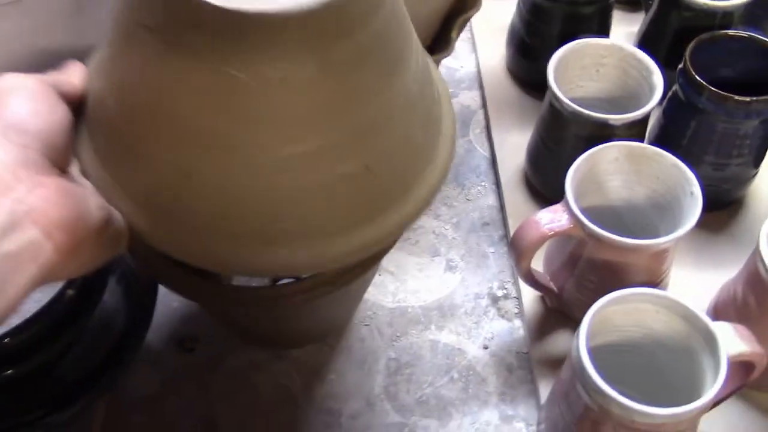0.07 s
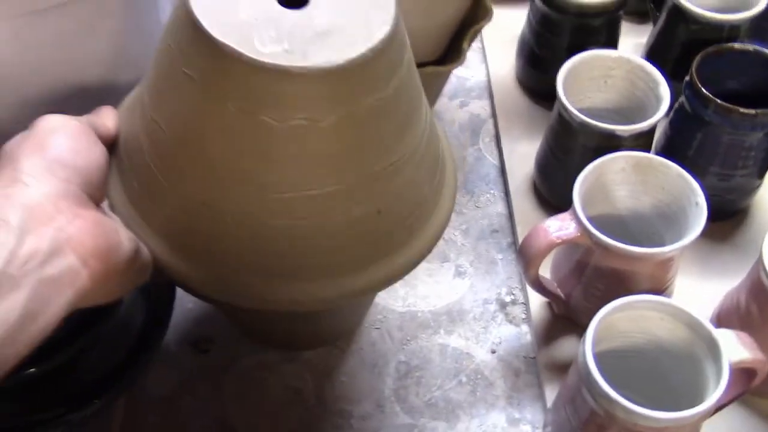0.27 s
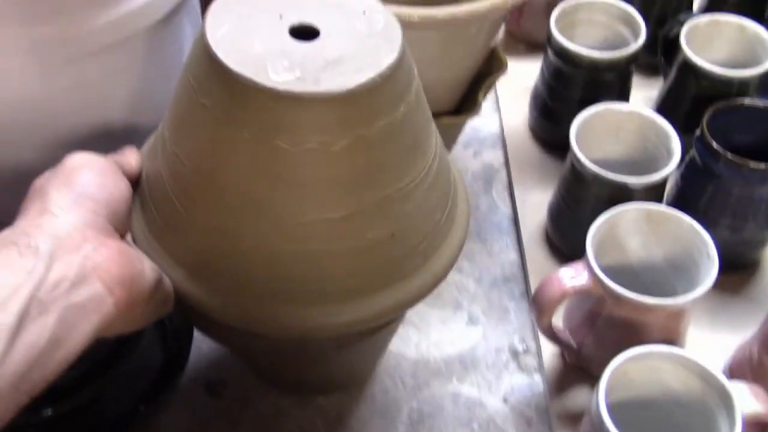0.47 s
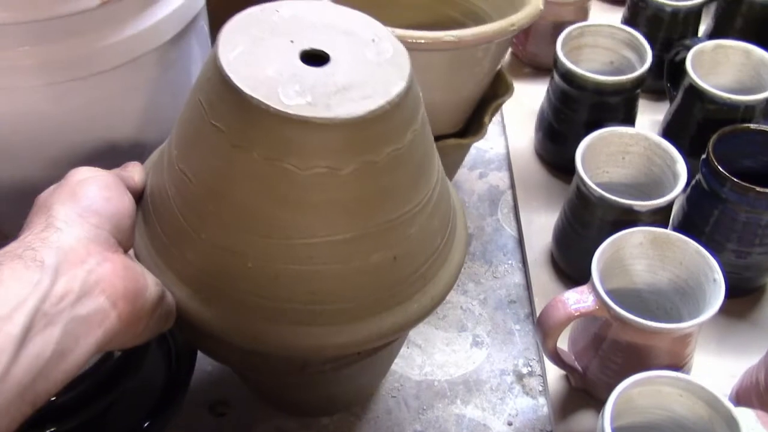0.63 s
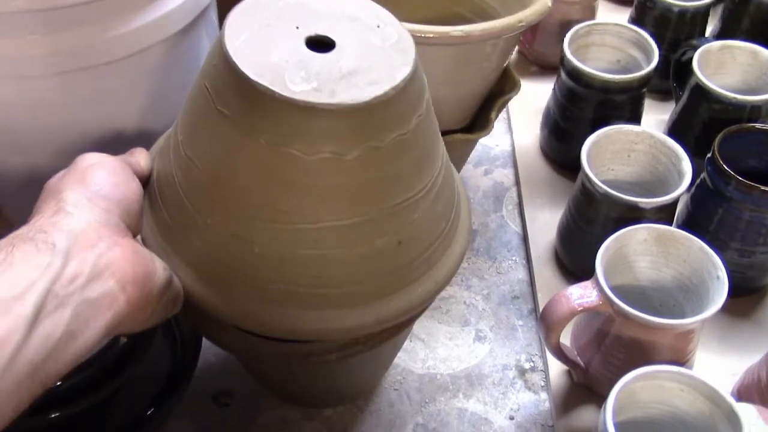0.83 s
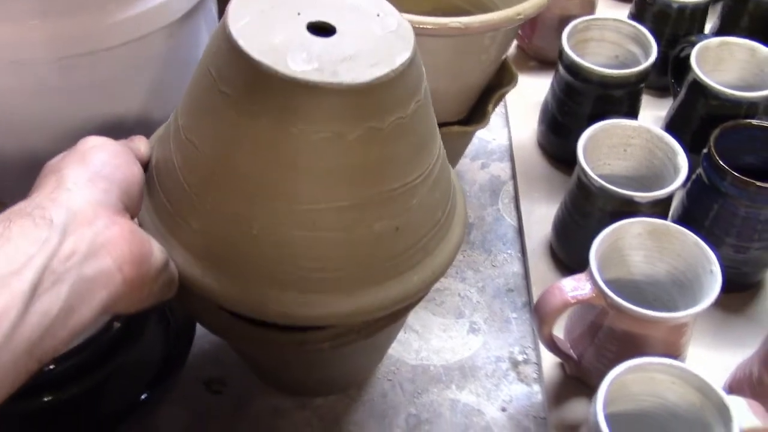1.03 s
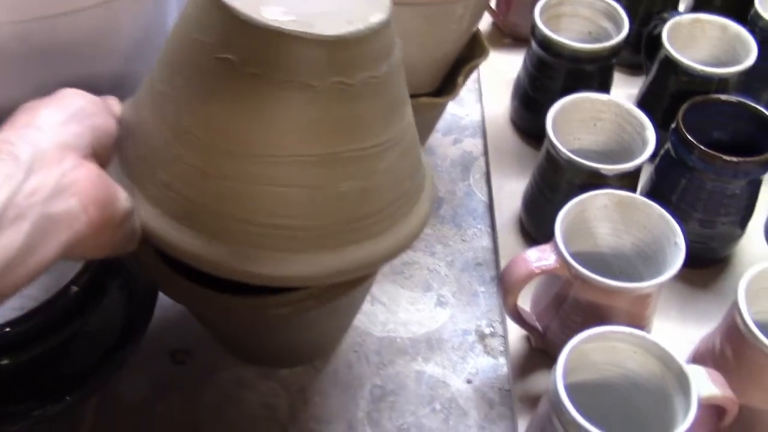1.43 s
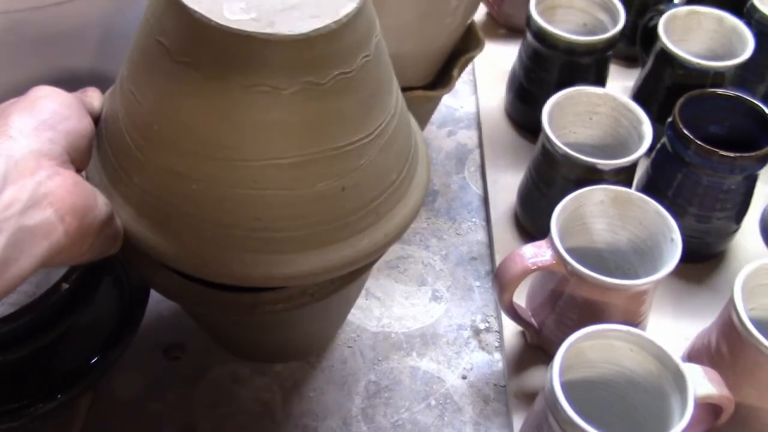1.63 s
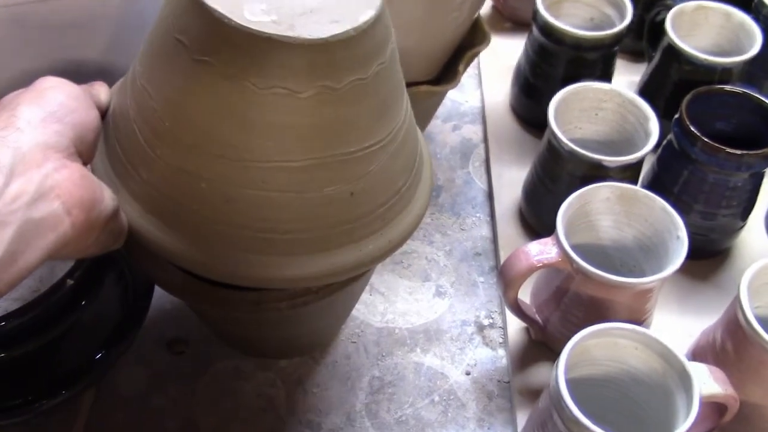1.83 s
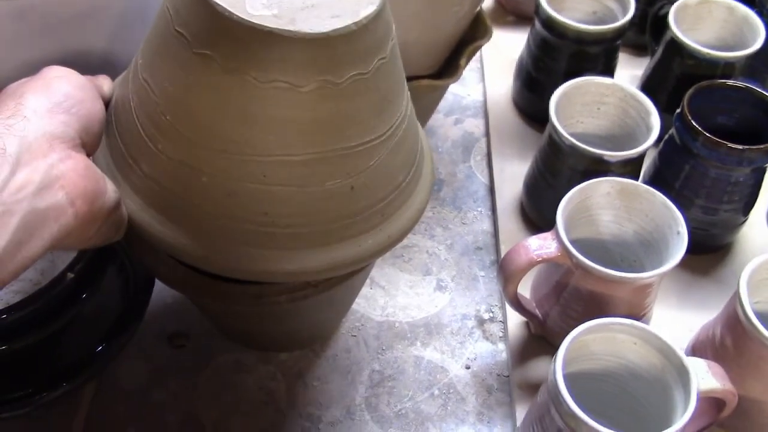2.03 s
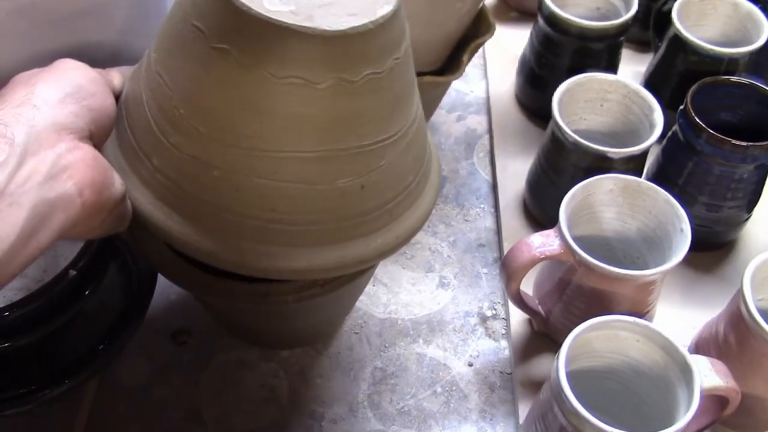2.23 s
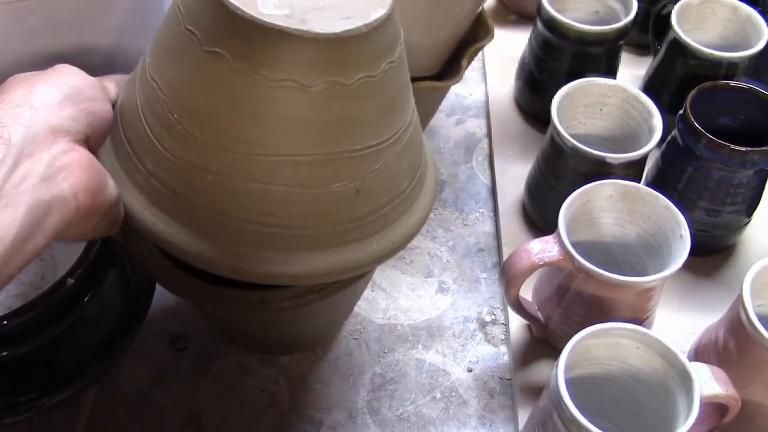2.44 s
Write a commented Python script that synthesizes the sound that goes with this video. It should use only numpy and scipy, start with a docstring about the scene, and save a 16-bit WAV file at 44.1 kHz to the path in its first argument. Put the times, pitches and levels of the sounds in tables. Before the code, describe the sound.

A clay pot lands on another with a loud, ringing clank and a table thump at 0.25 seconds. A dull knock, light clinks and two brief slips follow from 0.6 to 0.85. The rims grind and clack with hollow thuds from 1.0, reaching a ringing knock near 1.5. Two shorter scrapes come at 1.8 and from 2.1 to 2.3, then a faint tick at 2.5, over quiet room tone.

```python
"""A large clay pot is lowered upside down onto a smaller one on a workshop table, then shifted about.
Each contact rings the upper pot, clacks in the damped lower pot and thuds in the hollow between them.
The heaviest blows shake the table, and one duller knock falls between the first clinks. The rims
grind in two brief slips and three pushes. A limiter ducks the blows, so the ringing swells after them."""
import sys
import numpy as np
from scipy import signal
from scipy.fft import rfft, irfft
from scipy.io import wavfile
from scipy.ndimage import uniform_filter1d, minimum_filter1d

SR = 44100
rng = np.random.default_rng(int(sys.argv[2]) if len(sys.argv) > 2 else 0)


def transcribe(signal):
    """Save signal, clipped to [-1, 1], as a 16-bit WAV file at the path in sys.argv[1]."""
    frames = np.atleast_2d(signal).T
    limited = np.clip(frames, -1, 1)
    pcm = np.round(limited * 32767).astype(np.int16)
    wavfile.write(sys.argv[1], SR, pcm)


N = 114660
T = np.arange(N) / SR

# Rim meets rim. Each row: start in seconds, then ring, clack, the clack's extra bite and thud in dB,
# then brightness in Hz.
RIM_BLOWS = [(0.2475, -2.5, 13, -8.5, 14, 4580), (0.6389, -29.5, -8.5, -0.5, -3.5, 13100),
             (.699, -26, -12, 1.5, -35, 11400), (0.7917, -30.5, -6.5, 0.5, -15.5, 11000),
             (1.0328, -21.5, -27, -5, 1.5, 10900), (1.083, -15, 0.5, -9, 0, 6800),
             (1.105, -20, -24, -6, -5.5, 7100), (1.243, -22.5, 1, -3.5, 0.5, 8500),
             (1.264, -23, -6, 3.5, -6, 8560), (1.279, -17, -5, 3, 3.5, 9100),
             (1.363, -18.5, 2, 2.5, 2, 10100), (1.451, -39, -14, 4.5, -32, 12400),
             (1.461, -35, -1, 5, -5.5, 12000), (1.465, -1.5, 2, -1, -7.5, 2250),
             (1.7942, -29, -21, 7, 0.5, 10100), (1.8007, -24, -13, 7, -36, 11100),
             (1.844, -63, -42, -2, -5, 10000), (1.914, -35.5, -27.5, 6, -12.5, 10300),
             (2.104, -22, -15, 8.5, 2, 10100), (2.133, -56, -31, 17, -9.5, 10100),
             (2.2139, -43, -9.5, 5.5, -7.5, 10400), (2.249, -25, -16, 14, -4, 11200),
             (2.301, -20, -13.5, 9, -12, 8900), (2.311, -30.5, -8, -7, -4, 8250),
             (2.524, -39.5, -26, 10.5, -39, 11630)]
# The upper pot's modes, the tones it rings with. Each row: pitch in Hz, level on its edge in dB,
# level once seated in dB, ring time (to fade by 60 dB) in seconds.
UPPER_MODES = [(1039, -1, -8, .5), (2450, 1, 0, .42), (4299, -1, -26, .32), (4338, -14, -1, .15),
               (4960, -3, -21, .46), (4996, -18, -9, .13), (5585, -16, -1, .09), (5873, -20, -11, .35),
               (6629, -8, -9, .25), (7590, -13, -17, .2), (7789, -12, -6, .1), (7925, -9, -9, .19),
               (8162, -21, -12, .22), (8575, -14, -11, .19), (8976, -18, -8, .14), (9460, -11, -11, .24),
               (9773, -15, -14, .15), (10310, -11, -19, .16), (10560, -13, -15, .19), (11762, -12, -14, .2),
               (12440, -10, -13, .22), (12720, -24, -14, .15), (13500, -16, -14, .19),
               (14530, -20, -23, .16)]
# How a blow, a light tap and rubbing feed those modes. Each row: frequency in Hz, boost in dB.
BLOW_COLOUR = [(1000, -5), (2500, -5), (4300, -1), (5000, -0.5), (6500, 7.5), (9000, 8.5), (14000, 5.5)]
TAP_COLOUR = [(1000, 2), (2500, -8.5), (4300, -5), (6600, 9), (8500, 12.5), (9400, 3), (14000, -7)]
RUB_COLOUR = [(1000, -20.5), (2500, -2), (4300, -1), (5000, 6), (6500, -10.5), (9000, 0), (14000, -11.5)]
# Modes of the lower pot, the hollow and the dull knock.
# Each row: pitch in Hz, level in dB, ring time in seconds.
LOWER_MODES = [(1049, -22.5, 0.24), (1205, -18, 0.048), (1306, -32, 0.18), (2116, -26, 0.049),
               (2232, -8, 0.039), (2363, -11, 0.02), (3524, -13.5, 0.061), (3489, -10, 0.052),
               (3520, -13.5, 0.04), (5040, -18, 0.03), (7160, -16, 0.059), (7570, -25, 0.22),
               (9640, -17.5, 0.042), (9910, -18, 0.047)]
HOLLOW_MODES = [(205.5, -24, 0.18), (284.7, -10.5, 0.06), (334.3, 0, 0.087), (378.6, -10.5, 0.068),
                (484, -10, 0.091), (590, -17.5, 0.048)]
KNOCK_TONES = [(340, -8, .07), (484, -3, .12), (630, -8, .06), (824, 1, .1), (1010, -8, .05),
               (1314, -15, .25), (2820, -1, .12), (4100, -8, .08)]
# The hollow's main pitch as the rim gap opens and closes. Each row: time in seconds, pitch in Hz.
HOLLOW_GLIDE = [(.25, 351), (.79, 299), (.85, 341), (1.11, 339), (1.245, 317), (1.295, 340), (1.37, 285.5),
                (1.465, 339), (1.8, 300.4), (1.845, 333.5), (2.25, 331), (2.32, 348.4)]
# Noise colours: the crack of countless fast-dying clay modes, the table top and the room's steady tone.
# Each row: frequency in Hz, level in dB.
CRACK_SPECTRUM = [(30, -43), (120, 16), (250, -3), (800, 5.5), (1200, 10), (1750, -7), (2800, -3),
                  (4500, -7), (6200, -10), (8000, -2.5), (11000, -7.5), (15500, -17.5)]
TABLE_SPECTRUM = [(30, -41), (150, -6.5), (250, -0.5), (450, 7), (650, 0), (850, -0.5), (1200, -15.5),
                  (2000, -33.5), (15000, -40)]
ROOM_TONE_SPECTRUM = [(20, -45), (85, -39), (112, -8), (165, -4), (300, -6.5), (530, 5.5), (720, -9),
                      (1300, -10), (1800, -22.5), (4000, -31.5), (6200, -39), (11000, -44), (15000, -55)]
# Blows that shake the table. Each row: start in seconds, level in dB.
TABLE_THUMPS = [(0.2482, 15), (0.5704, -1.5), (1.464, -2.5), (1.7938, 0)]
# The dull knock and its rebound. Each row: start in seconds, level in dB, brightness in Hz.
DULL_KNOCKS = [(.566, -22, 7560), (0.5697, -14, 1680), (0.597, -23.5, 6500)]
# One list per slip or push. Each row: time in seconds, grinding in dB, judder in dB.
RIM_SLIDES = [
    [(.684, -40, -52), (.70, -21.5, -55), (.712, -36, -54)],
    [(.792, -34, -16), (.838, -27, -22.5), (.86, -62, -27)],
    [(.95, -40.5, -37), (.998, -44.5, -30), (1.012, -14.5, -38), (1.028, -29.5, -8), (1.038, -17.5, -22),
     (1.064, -25.5, -14.5), (1.094, -13, -7), (1.128, -25, -26), (1.224, -15, -9.5), (1.275, -16.5, -8.5),
     (1.294, -13, 4), (1.312, -37, -51), (1.336, -23, -41), (1.356, -18.5, -27), (1.374, -18, -24),
     (1.396, -28, -22), (1.42, -36, -54), (1.446, -21.5, -37), (1.468, -28.5, -21), (1.497, -15.5, -32),
     (1.51, -58, -36)],
    [(1.795, -14.5, -4.5), (1.836, -34, -23.5), (1.864, -25, -32), (1.892, -36, -17), (1.922, -31.5, -20.5),
     (1.965, -48, -68)],
    [(2.05, -51, -46), (2.078, -38, -29), (2.095, -23.5, -13), (2.108, -20.5, -8.5), (2.15, -26, -12.5),
     (2.186, -17, -20), (2.202, -27, -15.5), (2.26, -14, -11), (2.29, -27.5, -19), (2.322, -23, -7),
     (2.338, -38.5, -33), (2.442, -49.5, -43), (2.515, -47.5, -36.5), (2.526, -33, -34.5),
     (2.6, -42.5, -36)],
]

TAPPED_S, SEATED_S = .5, .75  # from these times on the pot only taps, then rests on the other's rim
FREE_RING, PRESSED_RING = 0.98, 0.87  # share of ring time kept after a blow and while rubbing
SEATED_TREBLE_RING, SEAT_DAMPS_HZ = 0.88, 5300  # share the seated pot keeps above this pitch
MODE_SPREAD_DB, MODE_STAGGER_S = 2, .005  # each upper mode gets its own strength and start
BITE_HZ, BITE_OCTAVES = 3500, 0.18  # the lower rim's sharpest modes
CRACK_DB, KNOCK_CRACK_DB, CRACK_RING_S = 10, 25, 0.12
GRIND_RING_DB, GRIND_CLACK_DB, GRIND_BITE_DB, GRIND_CRACK_DB, JUDDER_DB = -30, -18, 1.5, -15.5, -23
UPPER_RISE, LOWER_RISE = 0.0011, 0.02014  # share by which full pressure raises each pot's pitch


def from_db(db):
    """Turn decibels into a gain."""
    return 10 ** (np.asarray(db) / 20)


def rms_one(x):
    """Scale to an average (rms) level of 1."""
    return x / np.sqrt(np.mean(x ** 2) + 1e-20)


def soften(x, hz):
    """Turn down the treble above hz."""
    return signal.sosfilt(signal.butter(2, hz, fs=SR, output="sos"), x + 1e-18)


def bass_cut(x, hz, order):
    """Turn down the bass below hz; a higher order cuts more steeply."""
    return signal.sosfilt(signal.butter(order, hz, "high", fs=SR, output="sos"), x)


def coloured(spectrum):
    """Noise shaped to the given spectrum."""
    hz, db = np.transpose(spectrum)
    grid = np.maximum(np.fft.rfftfreq(N, 1 / SR), 1)
    gains = from_db(np.interp(np.log(grid), np.log(hz), db))
    return rms_one(irfft(rfft(rng.standard_normal(N)) * gains, N))


def smear(x, noise, ring_s):
    """Give x a tail of dying noise."""
    burst = noise * from_db(-60 * T / ring_s)
    return signal.fftconvolve(x, burst / np.linalg.norm(burst))[:N]


def taps(times, db, contact_hz, crumble_s=0):
    """One pulse of force per contact, longer when soft; a gritty contact crumbles briefly."""
    size = 512
    out, n = np.zeros(N + size), np.arange(size) + 1
    for start, gain, hz in zip(times, from_db(db), contact_hz):
        force = pulse = n * np.exp(-2 * np.pi * hz * (n - 1) / SR)
        if crumble_s:
            burst = rng.standard_normal(size) * np.exp(-n / (crumble_s * SR))
            force = pulse + 0.97 * np.convolve(pulse, burst / np.linalg.norm(burst))[:size]
        at = int(start * SR)
        out[at:at + size] += gain * force / pulse.sum()
    return out[:N]


def ring(modes, force):
    """Ring each mode as a dying sine wave, calling force() afresh to drive it."""
    out = 0
    for k, (hz, db, ring_s) in enumerate(modes):
        decay, step = from_db(-60 / (ring_s * SR)), 2 * np.pi * hz / SR
        feedback = [1, -2 * decay * np.cos(step), decay * decay]
        tone = signal.lfilter([0, np.sin(step)], feedback, force() + 1e-18)
        out += (-1) ** (k // 4) * from_db(db) * tone  # some modes swing the opposite way
    return out


def gliding(modes, force, tuning):
    """Ring modes whose pitches are multiplied by the tuning curve; force(hz) drives each one."""
    out, phase = 0, 2 * np.pi * np.cumsum(tuning) / SR
    for k, (hz, db, ring_s) in enumerate(modes):
        spin, decay = np.exp(1j * hz * phase), from_db(-60 / (ring_s * SR))
        swing = signal.lfilter([1], [1, -decay], force(hz) * spin.conj() + 1e-18)
        out += (-1) ** (k // 3) * from_db(db) * (spin * swing).imag
    return out


def wall_modes(colour, ring_share, seated):
    """The upper pot's modes for one kind of contact; the seat damps the high ones most."""
    colour_hz, colour_db = np.transpose(colour)
    modes = []
    for hz, edge_db, seated_db, ring_s in UPPER_MODES:
        db = (seated_db if seated else edge_db) + np.interp(np.log(hz), np.log(colour_hz), colour_db)
        seat_share = SEATED_TREBLE_RING if seated and hz > SEAT_DAMPS_HZ else 1
        modes.append((hz, db, ring_s * ring_share * seat_share))
    return modes


def upper_pot(grind):
    """The wall rings as it lands on its edge, is tapped, rocks on its seat and is rubbed."""
    times, ring_db, _, _, _, contact_hz = np.transpose(RIM_BLOWS)
    def struck(colour, which, seated):
        def force():
            db = ring_db + MODE_SPREAD_DB * rng.standard_normal(len(times))
            return taps(times[which] + MODE_STAGGER_S * rng.random(), db[which], contact_hz[which])
        return ring(wall_modes(colour, FREE_RING, seated), force)
    landing = struck(BLOW_COLOUR, times < TAPPED_S, seated=False)
    tapping = struck(TAP_COLOUR, (times >= TAPPED_S) & (times < SEATED_S), seated=False)
    rocking = struck(BLOW_COLOUR, times >= SEATED_S, seated=True)
    rubbed_modes = wall_modes(RUB_COLOUR, PRESSED_RING, seated=True)
    singing = gliding(rubbed_modes, lambda hz: grind, 1 + UPPER_RISE * pressure(grind))
    return landing + tapping + rocking + from_db(GRIND_RING_DB) * singing


def lower_pot(grind):
    """A dry clack and crack; where the rim is hit decides how sharply it bites."""
    times, _, clack_db, bite_db, _, contact_hz = np.transpose(RIM_BLOWS)
    def force(hz):
        bite = np.exp(-(np.log2(hz / BITE_HZ) / BITE_OCTAVES) ** 2)
        blows = taps(times, clack_db + bite * bite_db, contact_hz, crumble_s=0.0022)
        return blows + from_db(GRIND_CLACK_DB + bite * GRIND_BITE_DB) * grind
    clack = gliding(LOWER_MODES, force, 1 + LOWER_RISE * pressure(grind))
    crack_force = taps(times, clack_db, contact_hz) + from_db(GRIND_CRACK_DB) * grind
    crack = smear(crack_force, coloured(CRACK_SPECTRUM), CRACK_RING_S)
    return clack + from_db(CRACK_DB) * crack


def hollow(judder, rest_hz=335):
    """The air between the pots thuds, its pitch following the gap between the rims."""
    times, _, _, _, thud_db, contact_hz = np.transpose(RIM_BLOWS)
    force = taps(times, thud_db, contact_hz) + from_db(JUDDER_DB) * judder
    tuning = np.interp(T, *np.transpose(HOLLOW_GLIDE)) / rest_hz
    return soften(gliding(HOLLOW_MODES, lambda hz: force, tuning), hz=1180)


def table(gain_db=16, contact_hz=3000):
    """The loaded table top answers the heaviest blows with a dense, hollow thump."""
    times, db = np.transpose(TABLE_THUMPS)
    force = taps(times, db + gain_db, np.full(len(times), contact_hz))
    return smear(force, coloured(TABLE_SPECTRUM), ring_s=0.12)


def room_echo(x, level_db=-19.5, delay_s=0.0087):
    """The workshop sends back a short, slightly dull echo."""
    reflections = soften(rng.standard_normal(N), hz=3430) * (T > delay_s)
    return from_db(level_db) * smear(x, reflections, ring_s=0.22)


def dull_knock():
    """A pot bumps against something beside it that rings less."""
    force = taps(*np.transpose(DULL_KNOCKS))
    crack = smear(force, coloured(CRACK_SPECTRUM), CRACK_RING_S)
    return ring(KNOCK_TONES, lambda: force) + from_db(KNOCK_CRACK_DB) * crack


def grit(grains_per_s=4000, spread_db=4.5, clump_db=3):
    """Sand grains in the clay catch and let go, in uneven clumps."""
    sizes = from_db(spread_db * np.minimum(rng.exponential(1, N), 5)) * rng.choice([-1, 1], N)
    clumps = from_db(clump_db * rms_one(soften(rng.standard_normal(N), hz=92)))
    catches = rng.random(N) < grains_per_s / SR
    return rms_one(sizes * clumps * catches)


def sliding():
    """Rim sliding on rim makes two forces: fine grinding and a heavy shaking, the judder."""
    grind, judder = 0, 0
    for slide in RIM_SLIDES:
        times, grind_db, judder_db = np.transpose(slide)
        moving = (T >= times[0]) & (T <= times[-1])
        grind += moving * from_db(np.interp(T, times, grind_db))
        judder += moving * from_db(np.interp(T, times, judder_db))
    return grind * grit(), judder * grit()


def pressure(grind, full_db=-25.5, wander_share=0.13):
    """How hard the rims press, from 0 to about 1; it wavers as the contact point wanders."""
    effort = np.sqrt(np.abs(uniform_filter1d(grind ** 2, size=1300)))
    wander = rms_one(soften(rng.standard_normal(N), hz=25))
    return np.tanh(effort / from_db(full_db)) * (1 + wander_share * wander)


def scene(room_tone_db=-38.5):
    """The pots on their table, over the room's steady tone."""
    grind, judder = sliding()
    pots = upper_pot(grind) + lower_pot(grind) + hollow(judder)
    direct = bass_cut(pots + dull_knock() + table(), hz=211.8, order=5)  # the blows and their ringing sound with little deep bass
    return (direct + room_echo(direct) + from_db(room_tone_db) * coloured(ROOM_TONE_SPECTRUM))[None]


def record(dry, limit_db=-4.5, release_db_per_s=218, sense_s=.003, attack_s=.0015, top_hz=15900):
    """A limiter turns loud moments down fast and recovers steadily; peaks, bass and top are trimmed."""
    power = uniform_filter1d(dry[0] ** 2, int(sense_s * SR))
    over_db = np.maximum(10 * np.log10(np.abs(power) + 1e-12) - limit_db, 0)
    duck_db = np.maximum.accumulate(over_db + release_db_per_s * T) - release_db_per_s * T
    width = int(attack_s * SR)
    gain = from_db(uniform_filter1d(minimum_filter1d(-duck_db, width), width))
    rounded = np.tanh(dry * gain)
    thinned = bass_cut(rounded, hz=92, order=1)
    return signal.sosfilt(signal.ellip(10, .1, 80, top_hz, fs=SR, output="sos"), thinned)


dry = scene()
out = record(dry)
transcribe(out)
```